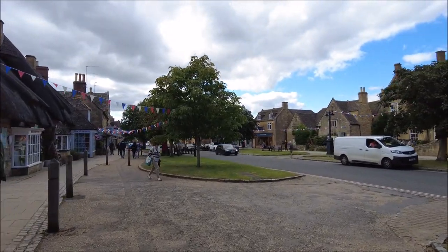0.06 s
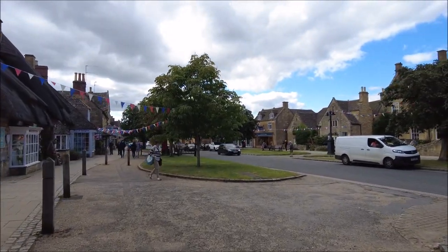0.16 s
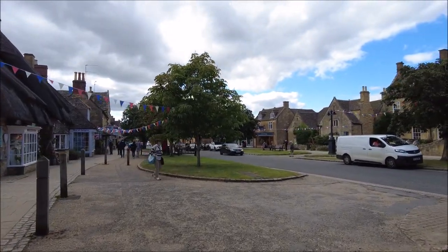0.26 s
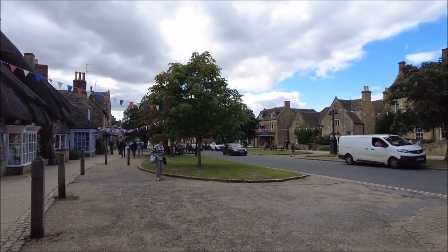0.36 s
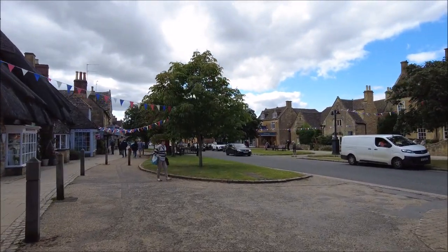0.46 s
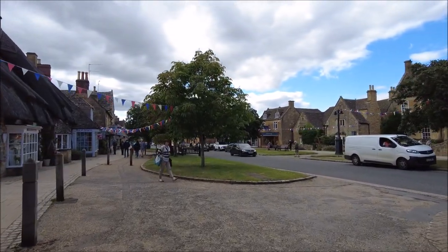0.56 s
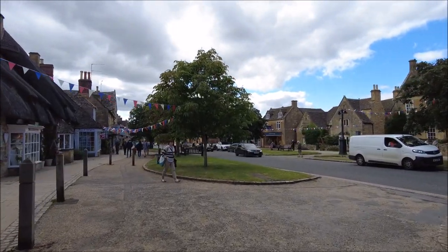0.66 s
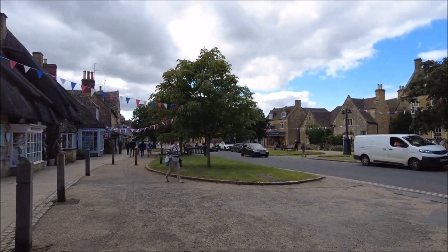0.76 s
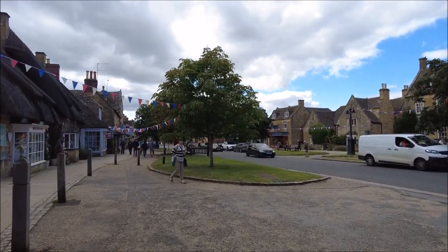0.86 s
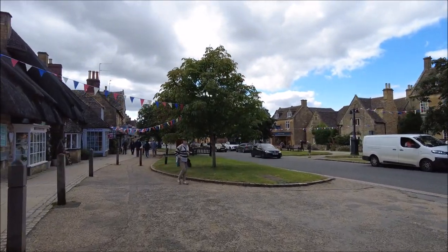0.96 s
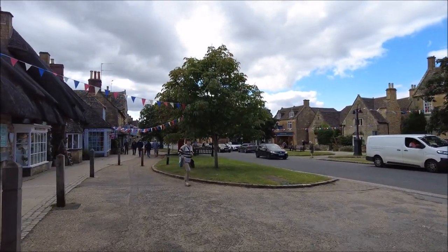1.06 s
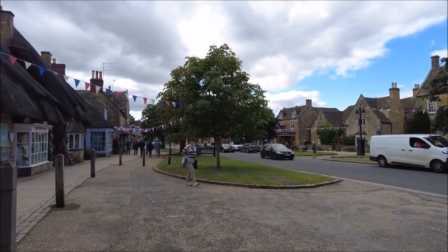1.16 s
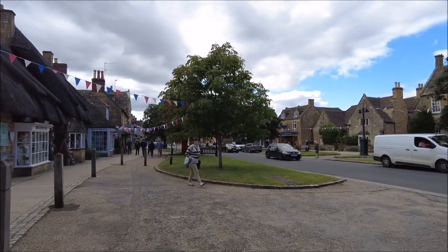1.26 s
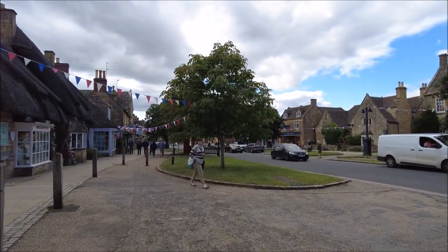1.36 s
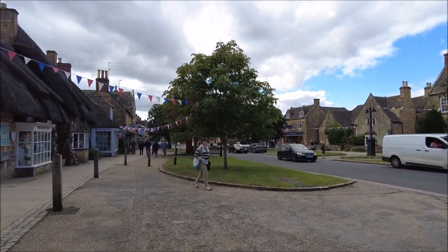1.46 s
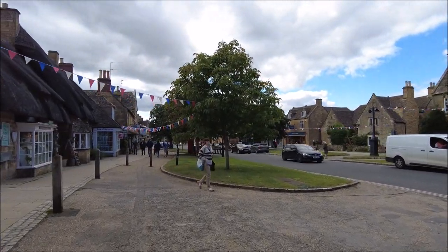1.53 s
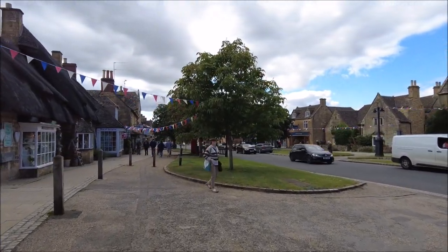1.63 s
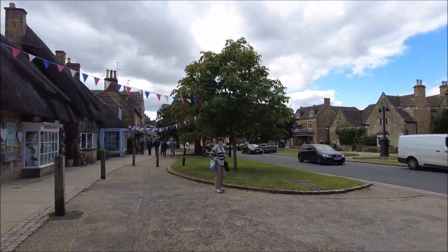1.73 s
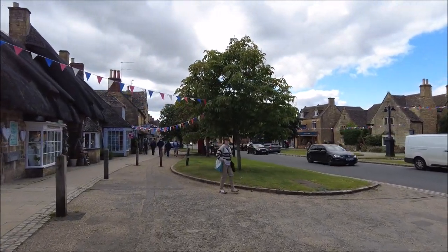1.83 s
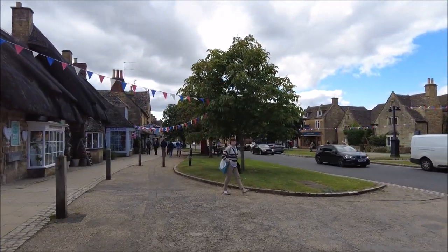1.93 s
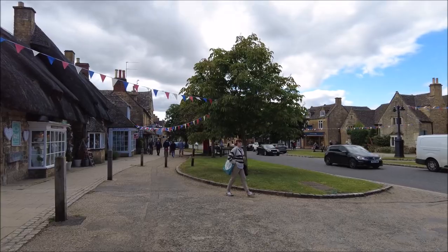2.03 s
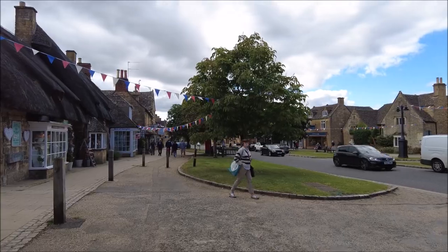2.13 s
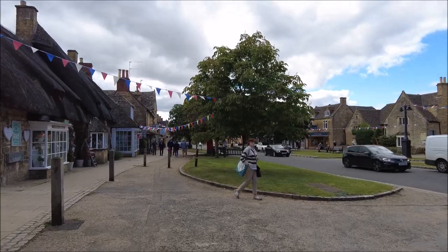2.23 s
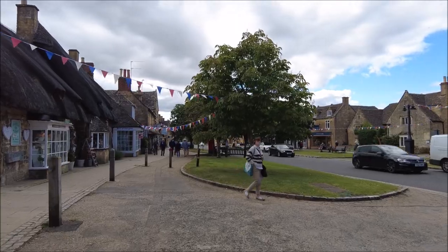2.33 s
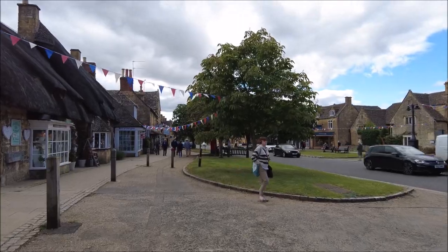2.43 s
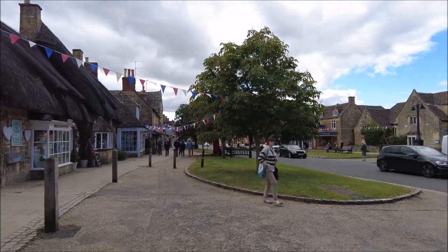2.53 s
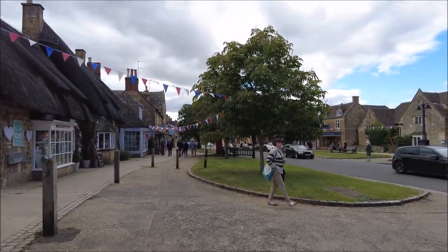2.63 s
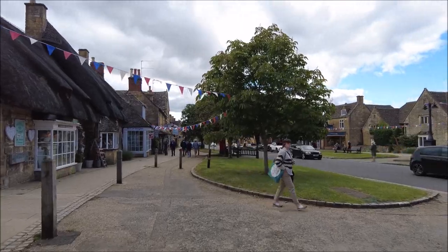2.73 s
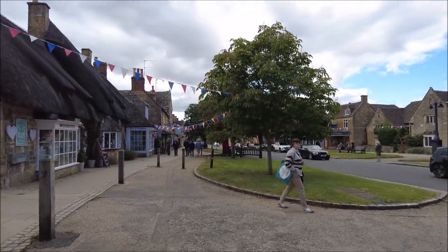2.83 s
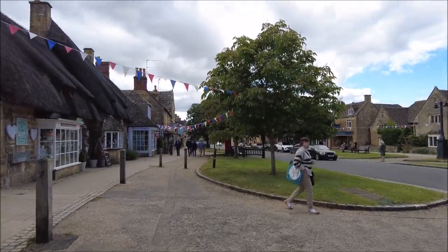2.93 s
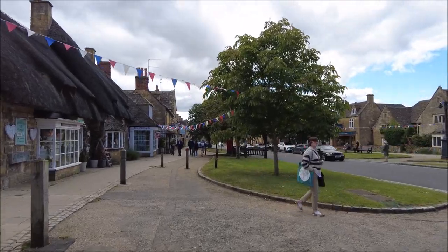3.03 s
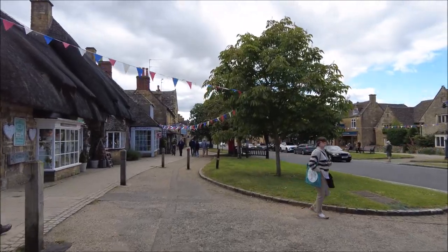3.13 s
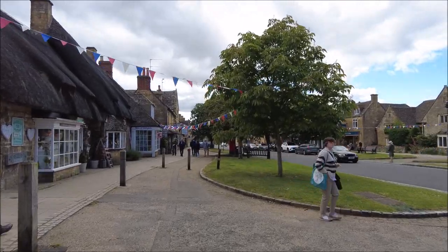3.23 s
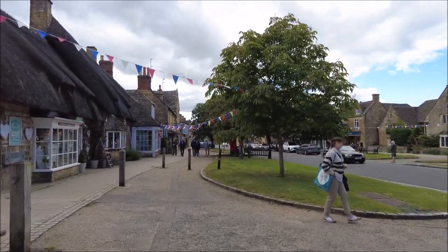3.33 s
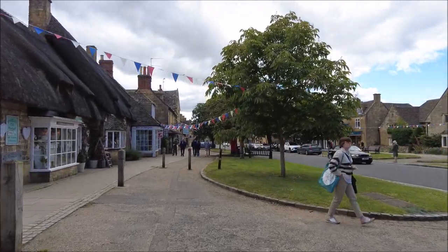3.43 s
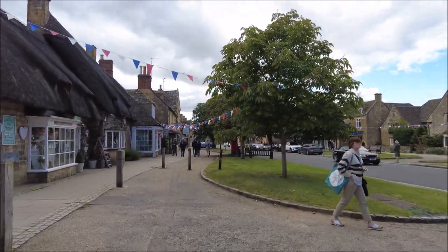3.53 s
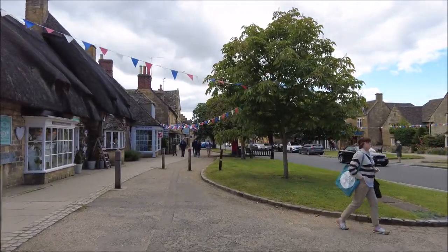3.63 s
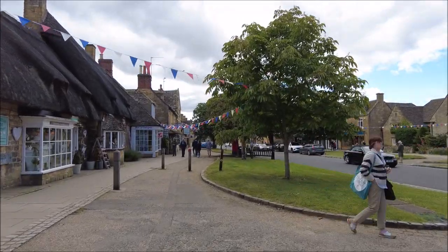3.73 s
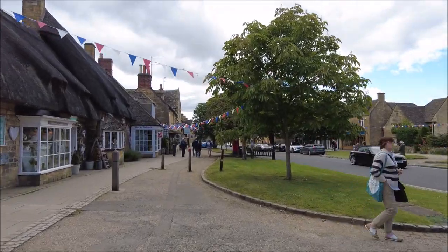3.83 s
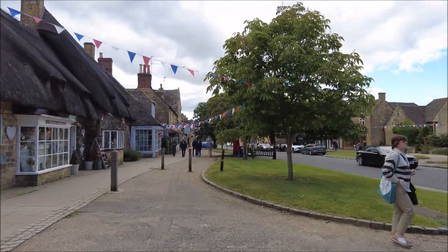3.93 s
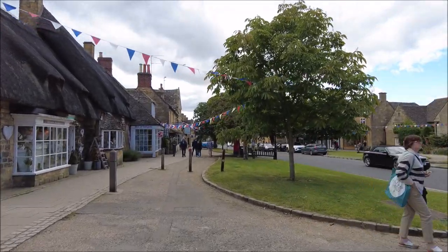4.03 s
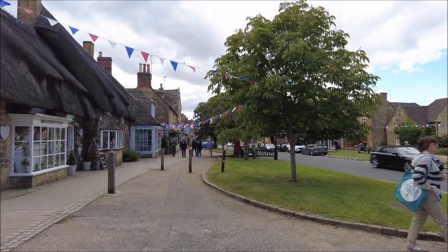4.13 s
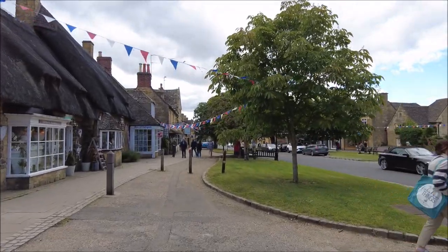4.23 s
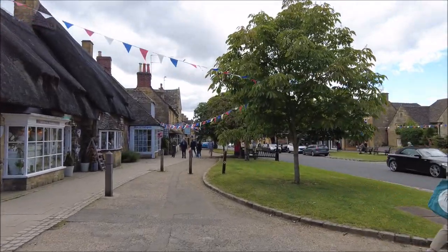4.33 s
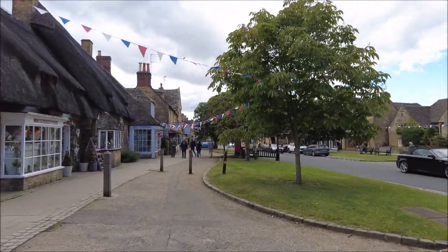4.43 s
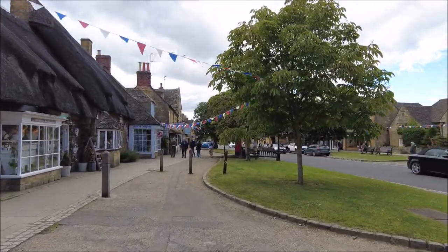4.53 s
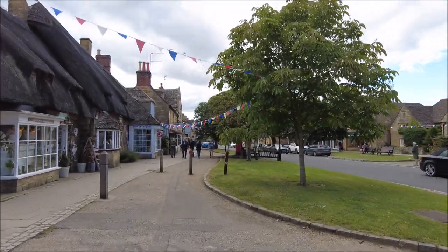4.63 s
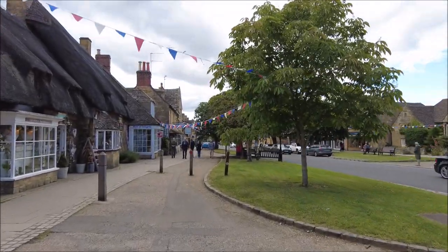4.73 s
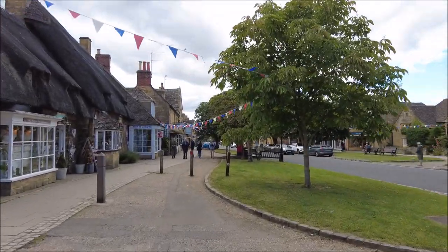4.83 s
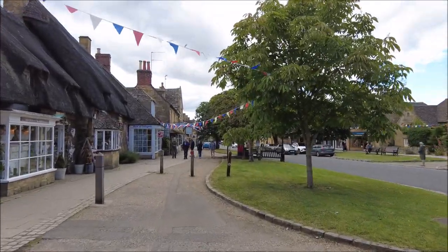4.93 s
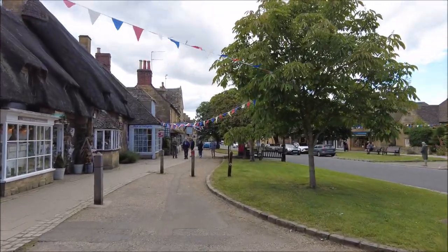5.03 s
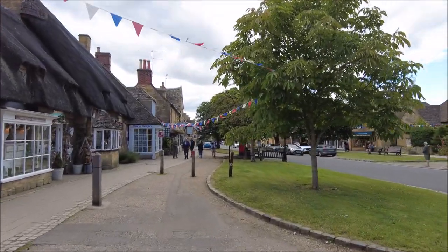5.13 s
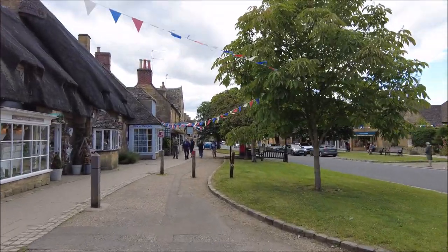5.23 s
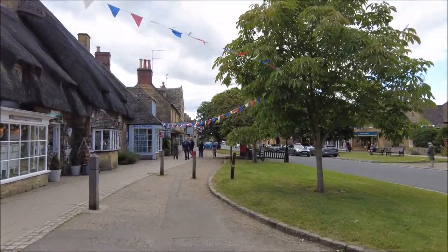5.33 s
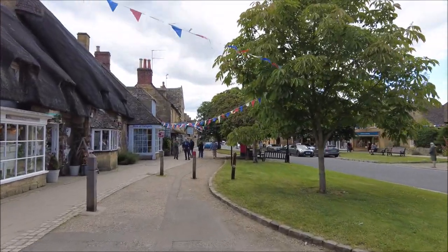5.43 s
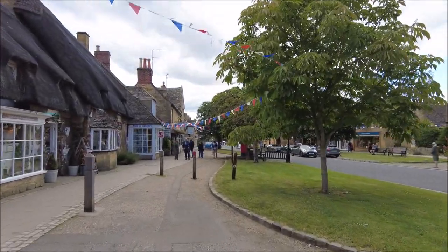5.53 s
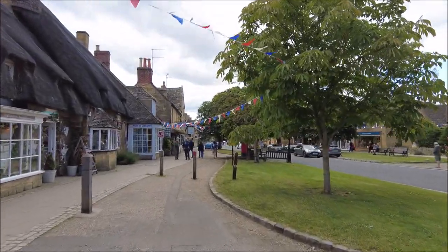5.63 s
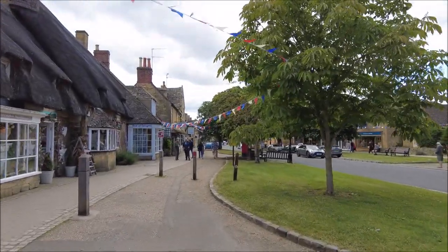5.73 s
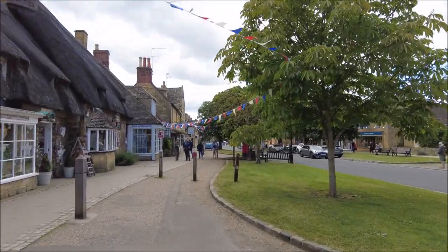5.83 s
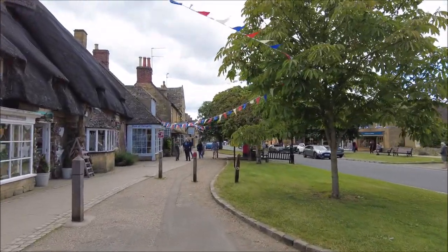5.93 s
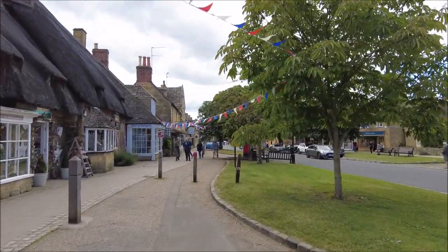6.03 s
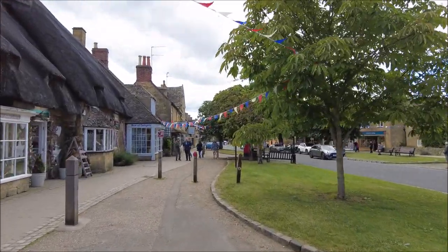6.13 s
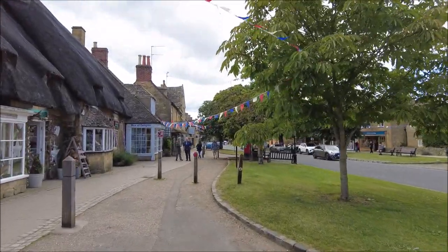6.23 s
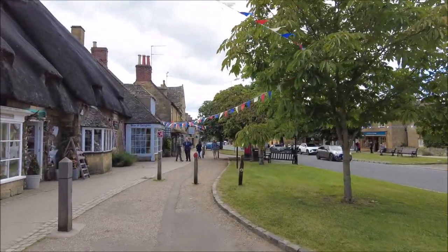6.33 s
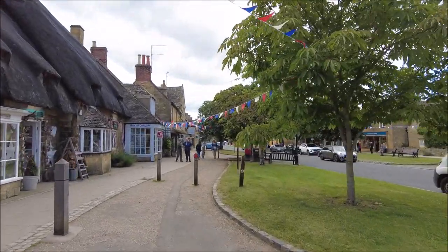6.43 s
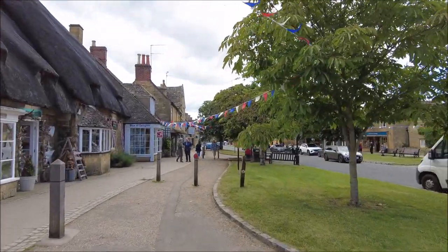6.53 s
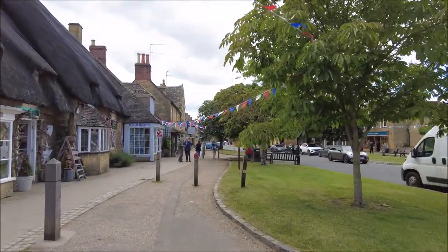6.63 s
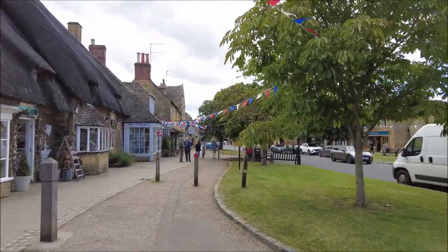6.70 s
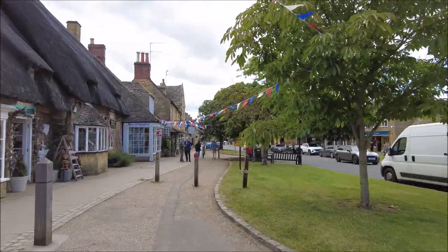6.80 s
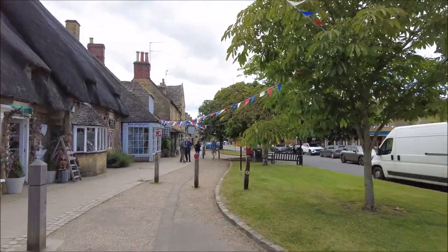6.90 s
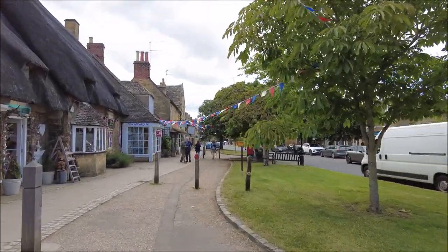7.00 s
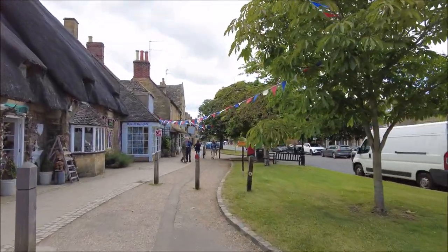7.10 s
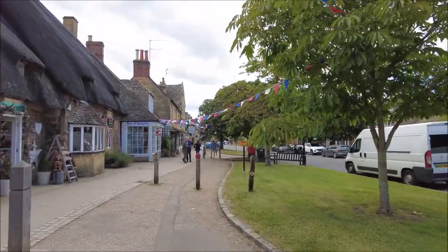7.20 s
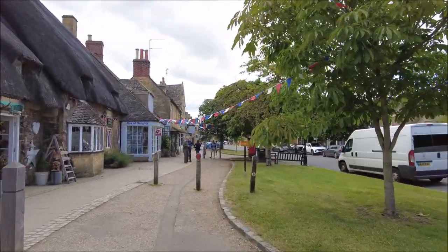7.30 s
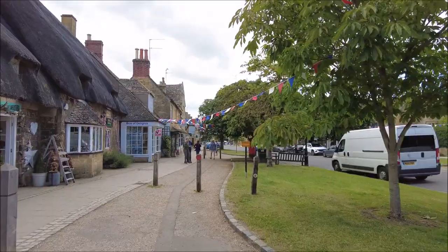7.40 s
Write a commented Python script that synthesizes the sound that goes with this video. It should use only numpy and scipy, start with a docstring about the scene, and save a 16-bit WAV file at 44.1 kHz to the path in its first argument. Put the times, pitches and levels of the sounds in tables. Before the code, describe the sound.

Low traffic rumble and tyre noise outdoors, light wind and shoe scuffs close by, a brief air hiss, and a diesel van speeding up at the end.

```python
"""A village street: five swells of rolling traffic, then a diesel van pulls past on the right and speeds up.
Its exhaust is a series of harmonics of the firing rate, beating against the note of the cars ahead;
road noise is shaped noise that falls with distance. Light wind buffets the microphone of a walker on the
pavement (low noise); shoes scuff (swelling noise) and click (damped rings), a brake squeals faintly (a
gliding tone) and air is released in one short hiss (noise with a whistle and an echo)."""
import sys
import numpy as np
from scipy import signal
from scipy.fft import rfft, irfft
from scipy.io import wavfile
from scipy.ndimage import uniform_filter1d

SR = 44100
rng = np.random.default_rng(int(sys.argv[2]) if len(sys.argv) > 2 else 0)


def wav_record(signal):
    """Record a signal, one row per channel, as 16-bit PCM in the file named by sys.argv[1]."""
    frames = np.transpose(np.atleast_2d(signal))
    bounded = np.clip(frames, -1, 1)
    # unit amplitude maps onto the largest positive 16-bit level
    quanta = np.round(bounded * 32767).astype(np.int16)
    wavfile.write(sys.argv[1], SR, quanta)


N = 328986
T = np.arange(N) / SR  # t/s
HZ = np.fft.rfftfreq(N, 1 / SR)  # f/Hz

# Distant traffic, spectral density: f/Hz, relative density/dB
STREET_COLOUR = [(130, -6.5), (270, -1), (450, -17.5), (650, -23.5), (900, -22), (1150, -24.5), (1450, -20),
                 (1720, -21.5), (2000, -30), (3000, -35), (4500, -38.5), (7000, -45.5), (11000, -54.5),
                 (15000, -58)]
# The same between the two ports: f/Hz, coherence, lead of left/rad, left minus right/dB
STREET_PORTS = [(150, 1, 0.0032, 2), (450, 0.95, 0.013, 2), (700, 0.39, 0.0034, 5), (1020, 0.45, 0.0074, 9),
                (1310, 1, 0.0037, -3), (2000, 0.32, 0.01, 0), (3500, 0.32, 0.013, 0.5),
                (15000, .35, 0.0056, 0.5)]
STREET_DB = -45.06

# Vehicles rolling by: closest at t/s, time to travel its closest distance/s,
# then relative level/dB of body drone, tread roar and tyre hiss
VEHICLES = [(1.37, 0.14, -45.5, -51, -76), (3.101, 1.48, -41, -44, -61.5), (4.7, 0.37, -49, -45, -63),
            (5.45, 1.01, -38, -42, -52.5), (6.9, 1.05, -39.5, -44.5, -59.5)]
# Exponent of distance by which the amplitude of each falls
DRONE_FALL, ROAR_FALL, HISS_FALL = 1.85, 1.99, 1.71
# How far the traffic has come abreast: t/s, share (0 ahead, 1 alongside)
ABREAST_SHARE = [(0, 0), (3.2, 0), (4.2, 0.38), (4.8, 0.89), (5.4, 1), (7.46, 0.97)]
# Drone and roar, spectral density: f/Hz, relative density/dB
ROAR_COLOUR_AHEAD = [(130, 5.5), (180, -2.5), (235, 4), (300, -3), (400, -10.5), (520, -17.5), (700, -13),
                     (900, -11), (1030, -14), (1170, -21.5), (1400, -21), (1750, -24), (2100, -28.5),
                     (2500, -24.5)]
ROAR_COLOUR_ALONGSIDE = [(130, 1.5), (180, -8), (235, -2), (300, -8.5), (400, -14), (520, -16.5),
                         (700, -21.5), (900, -22.5), (1030, -22.5), (1170, -23), (1400, -19), (1750, -24),
                         (2100, -26.5), (2500, -24)]
# Tyre hiss, spectral density: f/Hz, relative density/dB
HISS_COLOUR_AHEAD = [(2500, 0), (3100, -1.5), (3700, -10), (4400, -8), (5500, -18), (7000, -20),
                     (7800, -15), (8600, -21.5), (9500, -19), (11000, -20.5), (12500, -24.5),
                     (15500, -33.5)]
HISS_COLOUR_ALONGSIDE = [(2500, 0.5), (3100, -1), (3700, -3.5), (4400, -5), (5500, -8), (7000, -14),
                         (7800, -12), (8600, -18), (9500, -15.5), (10200, -20), (10900, -17),
                         (11600, -22.5), (12500, -21.5), (15500, -25.5)]
# Top band of the tyre hiss, which opens up once the cars are alongside: t/s, level/dB
FIZZ_LEVEL = [(0, -85), (1.5, -83), (2.6, -72.5), (3.6, -70.5), (4.33, -72.5), (4.58, -66), (5.3, -61),
              (6.1, -60.5), (6.55, -62), (6.9, -65), (7.46, -71.5)]
FIZZ_FROM_HZ = 6100
# Traffic between the two ports: f/Hz, coherence, lead of left/rad, left minus right/dB
AHEAD_PORTS = [(150, 1, -0.45, 3), (500, 0.89, 0.23, 0.5), (756, 0.64, 0.91, 3.5), (1080, 0.55, -0.54, 8),
               (1290, 1, -0.77, -1.5), (1900, 0.6, 1, -3), (4200, .2, -0.45, -11.5), (6000, .2, -.1, -12),
               (10000, .7, 0, -0.5), (15000, .4, -0.1, -11)]
ALONGSIDE_PORTS = [(101, 1, -1.04, 0), (313, 0.77, 0.98, -3), (473, 0.57, -1, 0), (710, 0.82, -2.5, -1.2),
                   (1050, 0.71, -3, 0.6), (1350, 0.5, -0.4, -3), (1950, 0.91, -1, -3),
                   (2800, 0.47, -2, -3.5), (4200, 0.26, -2, -4), (10000, .07, -1.5, -5.5),
                   (15000, .4, 0, -2.5)]

# Firing rate of the cars ahead, nearly steady: t/s, f/Hz
CRUISE_RATE = [(0, 55.5), (2.3, 54), (2.7, 53.3), (5.5, 53.4), (5.9, 54.8), (6.2, 56), (6.5, 54.8),
               (6.85, 54.5), (7.1, 52)]
# Their engine note and its octave come and go: t/s, level/dB
CRUISE_LEVEL = [(0, -44.5), (1.0, -52), (1.5, -55), (2.45, -38), (2.56, -49), (3.03, -31), (3.2, -35),
                (3.3, -40.5), (3.55, -37), (3.95, -31), (4.2, -37), (4.8, -31), (5.7, -29), (6.3, -34),
                (6.8, -38), (7.1, -49.5)]
CRUISE_OCTAVE_LEVEL = [(0, -47), (2.15, -48.5), (2.5, -58), (2.62, -38), (2.85, -42), (3.2, -50),
                       (3.35, -39.5), (4.2, -41.5), (4.5, -45.5), (5.6, -37), (6.2, -41), (6.75, -35.5),
                       (6.95, -47)]
IN_STEP_S = 5.61  # a moment when both engine notes add up

# Firing rate of the diesel van, which idles along and then speeds up: t/s, f/Hz
VAN_RATE = [(0, 57.3), (2.3, 56.4), (4.5, 56.4), (4.9, 55.7), (5.5, 56.7), (5.9, 58.3), (6.1, 59.1),
            (6.42, 59.9), (6.68, 62.7), (7.0, 64.1), (7.3, 66), (7.46, 66.2)]
# Its exhaust fundamental, blipping as the driver steps on the throttle: t/s, level/dB
BOOM_LEVEL = [(0, -56), (1.6, -64), (3.8, -51), (4.5, -39.5), (5.4, -39), (5.76, -37), (5.88, -20.5),
              (6.05, -25.5), (6.33, -26), (6.55, -20.5), (6.72, -15), (7.0, -18.5), (7.3, -12)]
# Its overtones as a group, stronger under load: t/s, relative level/dB
LOAD_LEVEL = [(0, -61.5), (3, -55.5), (4.5, -45.5), (5.6, -49), (6.3, -40.5), (6.7, -37.5), (6.95, -40.5),
              (7.46, -40)]
# Each overtone: multiple of the firing rate, relative level/dB
OVERTONES = [(1.5, -12), (2, 4), (2.5, -19), (3, 0), (3.5, -8), (4, -7), (4.5, -7), (5, -14.5), (6, -7),
             (7, -6)]
# Resonances of the exhaust pipe: f/Hz, relative level/dB
PIPE_RESPONSE = [(75, 15), (108, -3), (128, 0), (160, 0), (180, -7.5), (196, -1), (218, -2.5), (255, -0.5),
                 (360, -6.5), (460, -28)]

# Breeze on the microphone, dropping and then freshening: t/s, relative level/dB
BREEZE_LEVEL = [(0, -42.5), (1.05, -42), (1.5, -45.5), (3.5, -45), (4.3, -38), (7.46, -34.5)]
# Gusts: centre t/s, half length/s, relative level/dB, upper band edge f/Hz
GUST_EVENTS = [(0.794, 0.023, -32.5, 88), (4.06, 0.039, -31.5, 300), (4.562, 0.013, -29.5, 150),
               (5.273, 0.18, -36, 300), (5.772, 0.02, -31.5, 41.7), (5.954, 0.046, -28, 40),
               (6.293, 0.12, -41, 140), (6.68, 0.085, -34, 140.2)]
# Wind, spectral density: f/Hz, relative density/dB
WIND_COLOUR = [(8, -14.5), (22, -1.5), (38, -6.5), (58, 1.5), (85, -5.5), (130, -17), (300, -41)]

# Soft scuffs of soles: start t/s, length/s, peak level/dB
SCUFF_EVENTS = [(0, 0.018, -51), (0.303, 0.13, -61), (.95, 0.082, -64), (1.376, 0.096, -65),
                (1.89, 0.089, -63), (7.301, 0.12, -60)]
# Scuffs, spectral density: f/Hz, relative density/dB
SCUFF_COLOUR = [(800, 7), (2500, 4), (5000, -6), (8000, -13), (12000, -13), (16000, -33)]

# Clicks and knocks of shoes and grit: t/s, relative level/dB, ring f/Hz, ring t60/s, share of crunch
CONTACTS = [(0.4620, -29, 2480, 0.0042, 0.03), (0.4632, -39, 1600, .007, .05),
            (0.8505, -45, 2900, .008, 0.3), (0.953, -38, 1000, .014, .15),
            (1.0134, -21.5, 1230, 0.015, 0.08), (1.0142, -25, 800, .018, .1),
            (1.0165, -41, 1870, 0.075, 0.2), (1.0135, -41, 2100, .025, .3), (1.0192, -20, 350, 0.026, 0.15),
            (1.0328, -22, 1480, 0.011, 0.05), (1.036, -41, 1050, .11, .45), (1.037, -34, 395, .13, .2),
            (1.0655, -48.5, 8900, 0.0019, 0.1), (1.4138, -47, 2600, 0.008, 0.5),
            (1.943, -39, 2300, .004, 0.2), (1.952, -36, 1050, 0.03, 0.2), (1.959, -31, 1250, .02, .15),
            (6.791, -32, 2800, .003, .1)]
# Crunch after a contact: base t60/s, to which twice the ring's t60 is added, and spread/octaves
CRUNCH_T60, CRUNCH_OCTAVES = .032, .6

# Faint brake squeal
SQUEAL_S, SQUEAL_HALF_S, SQUEAL_HZ, SQUEAL_HZ_PER_S, SQUEAL_DB = 3.74, .08, 14600, 2200, -82

# Engine hum of the nearest car, with a Doppler fall
HUM_S, HUM_HALF_S, HUM_HZ, HUM_FALL_HZ_PER_S, HUM_DB = 4.77, .19, 211.7, 3, -39

# Jet of the short hiss: t/s, level/dB
JET_LEVEL = [(6.589, -63), (6.6, -48.5), (6.61, -49.5), (6.619, -47.5), (6.63, -53), (6.638, -52),
             (6.645, -58), (6.66, -57), (6.68, -64), (6.8, -70)]
# Hiss, spectral density: f/Hz, relative density/dB
JET_COLOUR = [(500, -56), (2000, -24), (3300, 4), (4300, -6), (4750, 4), (5400, 1), (6500, 0.5),
              (8000, 2.5), (8700, -1.5), (10500, -1.5), (13000, -11), (16000, -6)]
# Whistle within the hiss, and the duller echo from the street
WHISTLE_S, WHISTLE_HALF_S, WHISTLE_HZ, WHISTLE_WIDTH_HZ, WHISTLE_DB = 6.609, .015, 4850, 160, -49.5
ECHO_S, ECHO_T60, ECHO_TOP_HZ, ECHO_DB = 6.628, .5, 7500, -58.5

# The stereo image closes quickly and opens slowly: start and duration of each
CLOSE_S, CLOSING_S, OPEN_S, OPENING_S = .98, .29, 1.41, 1.95
EDGE_HZ = 15750  # upper band limit


def gain_of(db):
    """Amplitude ratio: 20 dB for each factor of ten."""
    return 10 ** (np.asarray(db) / 20)


def evened(x):
    """Normalisation: the mean of the channels gets rms 1."""
    return x / np.sqrt(np.mean(np.atleast_2d(x).mean(0) ** 2) + 1e-20)


def curve(rows, axis=1):
    """Linear interpolation in time of one column of a table."""
    rows = np.array(rows, float)
    return np.interp(T, rows[:, 0], rows[:, axis])


def read(points, axis=1, hz=HZ):
    """Interpolation of one column of a table along logarithmic frequency."""
    points = np.array(points, float)
    return np.interp(np.log(hz + 1), np.log(abs(points[:, 0]) + 1), points[:, axis])


def white():
    """White noise: a complex Gaussian spectrum of equal expected power in every bin."""
    return rng.standard_normal(len(HZ)) + 1j * rng.standard_normal(len(HZ))


def drift(rate_hz):
    """Random modulation: noise under a Gaussian low-pass, rms 1."""
    return evened(irfft(white() * np.exp(-(HZ / rate_hz) ** 2), N))


def bell(s, half_s):
    """Gaussian envelope of height 1."""
    return np.exp(-.5 * ((T - s) / half_s) ** 2)


def pair(colour, lo_hz, hi_hz, coherence, lead=0, balance_db=0):
    """Partial coherence: a noise band at two ports, whose mean has the given colour and rms 1."""
    same = np.clip(coherence, 0, 1)
    tilt = gain_of(balance_db / 2)
    turn = np.exp(-1j * lead)
    left = white()
    right = same * turn * left + np.sqrt(1 - same ** 2) * white()
    # undo the colour that interference gives the mean of the ports
    middle = np.sqrt(tilt ** 2 + tilt ** -2 + 2 * same * np.real(turn) + 1e-3)
    skirts = np.sqrt((1 + (lo_hz / (HZ + 1)) ** 16) * (1 + (HZ / hi_hz) ** 16))
    spectra = np.array([left * tilt, right / tilt])
    return evened(irfft(spectra * gain_of(read(colour)) / middle / skirts, N))


def ports(table):
    """Interaural cues of one direction: coherence, lead and balance at every bin."""
    return read(table, axis=1), read(table, axis=2), read(table, axis=3)


def firing_turns(rates, wobble=0.003):
    """Phase as the integral of a slightly wandering firing rate, in cycles from the in-step moment."""
    turns = np.cumsum(curve(rates) * (1 + wobble * drift(11.5))) / SR
    return turns - np.interp(IN_STEP_S, T, turns)


def street():
    """Diffuse field: distant traffic merges into a steady wash between the houses."""
    return pair(STREET_COLOUR, 95, 18000, *ports(STREET_PORTS)) * gain_of(STREET_DB)


def passing(ahead, alongside, lo_hz, hi_hz):
    """Equal-power crossfade of colour and direction as the traffic comes abreast."""
    share = np.clip(curve(ABREAST_SHARE), 0, 1)
    far = pair(ahead, lo_hz, hi_hz, *ports(AHEAD_PORTS))
    near = pair(alongside, lo_hz, hi_hz, *ports(ALONGSIDE_PORTS))
    return np.sqrt(1 - share) * far + np.sqrt(share) * near


def rolling(fall, axis):
    """Distance law: each vehicle's power rises as it nears and falls as it leaves; powers add."""
    power = 0
    for row in VEHICLES:
        distance = np.hypot(1, (T - row[0]) / row[1])  # in units of the closest distance
        power = power + gain_of(row[axis]) ** 2 / distance ** (2 * fall)
    return np.sqrt(power)


def road(turns):
    """Rolling noise: drone of bodies, roar of tread and hiss of tyres in adjoining frequency bands."""
    drone = passing(ROAR_COLOUR_AHEAD, ROAR_COLOUR_ALONGSIDE, 137.4, 530)
    drone = drone * rolling(DRONE_FALL, axis=2) * gain_of(0.3 + drift(4.7))
    roar = passing(ROAR_COLOUR_AHEAD, ROAR_COLOUR_ALONGSIDE, 401, 2060)
    roar = roar * rolling(ROAR_FALL, axis=3)
    hiss = passing(HISS_COLOUR_AHEAD, HISS_COLOUR_ALONGSIDE, 2330, FIZZ_FROM_HZ)
    hiss = hiss * rolling(HISS_FALL, axis=4)
    fizz = passing(HISS_COLOUR_AHEAD, HISS_COLOUR_ALONGSIDE, FIZZ_FROM_HZ, 18000)
    fizz = fizz * gain_of(curve(FIZZ_LEVEL))
    # loose grit roughens the hiss
    hiss = (hiss + fizz) * gain_of(0.76 * drift(250))
    # diesel firings throw out puffs of mechanical noise, heard once the van is near
    near = np.interp(T, [5, 6.3], [0, 1])
    clatter = 1 + 0.048 * near * (np.cos(2 * np.pi * turns) + .5 * np.cos(np.pi * turns))
    # uneven asphalt shakes both roar and hiss
    return drone + (roar + hiss) * gain_of(.5 * drift(10)) * clatter


def patchy(x, depth_db, fade_hz, size, count):
    """Shifting interference: bands swell and fade on their own as echoes off the house fronts shift."""
    hz, _, z = signal.stft(x, SR, nperseg=size)
    field = rng.standard_normal(z.shape[1:])
    field = uniform_filter1d(field, size=3, axis=0)
    field = uniform_filter1d(field, size=count, axis=1)
    gain = gain_of(depth_db * field / field.std() / (1 + hz[:, None] / fade_hz))
    gain = gain / np.sqrt(np.mean(gain ** 2, axis=1, keepdims=True))
    return signal.istft(z * gain, SR, nperseg=size)[1][:, :N]


def cruising(turns, balance_db=-0.5):
    """Beats: the cars' engine note lies a little below the van's and throbs against it."""
    low = gain_of(curve(CRUISE_LEVEL) + 0.2 * drift(9)) * np.cos(2 * np.pi * turns)
    octave_gain = gain_of(curve(CRUISE_OCTAVE_LEVEL) + 2.0 * drift(11))
    octave = octave_gain * np.cos(4 * np.pi * turns + 0.93 * drift(8.3))
    return np.sqrt(2) * (low + octave) * gain_of([[balance_db / 2], [-balance_db / 2]])


def exhaust(turns, balance_db=-2.0, lag_s=0.0002):
    """Source and filter: harmonics of the firing rate glide through the resonances of the pipe."""
    # from afar the sound arrives by shifting paths: it wavers more
    near = np.interp(T, [5.2, 6.1], [0, 1])
    level = curve(BOOM_LEVEL) + 2.0 * (1 - near) * drift(5.2)
    boom = gain_of(level) * np.cos(2 * np.pi * turns) * (1 + 0.043 * drift(37))
    # no two firings are alike, so level and phase of the overtones break up
    rate = curve(VAN_RATE)
    overtones = 0
    for k, db in OVERTONES:
        gain = gain_of(db + read(PIPE_RESPONSE, hz=k * rate) + 3.0 * drift(8.1))
        phase = 2 * np.pi * k * turns + 0.41 * drift(3.5) + 0.13 * drift(35)
        overtones = overtones + gain * np.cos(phase)
    note = np.sqrt(2) * (boom - gain_of(curve(LOAD_LEVEL)) * overtones)
    # the van is on the right: the left port hears it later and, once near, weaker
    lean_db = near * balance_db / 2 - (1 - near) * drift(15.0)
    return np.array([np.interp(T - lag_s, T, note), note]) * gain_of([lean_db, -lean_db])


def wind():
    """Turbulent pressure: lumpy low noise of a breeze, and gusts that strike the ports unequally."""
    breeze = gain_of(curve(BREEZE_LEVEL)) * pair(WIND_COLOUR, 8, 270, 0.99)
    gusts = 0
    for s, half_s, db, top_hz in GUST_EVENTS:
        gust = pair(WIND_COLOUR, 8, top_hz, 0.99, balance_db=-3)
        gusts = gusts + gain_of(db) * bell(s, half_s) * gust
    return (breeze + gusts) * gain_of(2 + 2 * drift(26))


def scuffs():
    """Sliding friction: soles on grit give short grainy swells of noise."""
    press = 0
    for s, length_s, db in SCUFF_EVENTS:
        press = press + gain_of(db) * np.sin(np.pi * np.clip((T - s) / length_s, 0, 1))
    return pair(SCUFF_COLOUR, 700, 18000, 0.58) * press * gain_of(3 * drift(495))


def knocks(rise_cycles=0.62):
    """Damped resonance: each contact builds up, rings and leaves a short crunch around its pitch."""
    out = np.zeros((2, N))
    size = 8192
    t = np.arange(size) / SR
    octave = np.log2(np.fft.rfftfreq(size, 1 / SR) + 1)
    for s, db, hz, t60, share in CONTACTS:
        ring = np.sin(2 * np.pi * hz * t) * np.exp(-np.log(1000) * t / t60)
        band = np.exp(-.5 * ((octave - np.log2(hz)) / CRUNCH_OCTAVES) ** 2)
        middle, side = irfft(rfft(rng.standard_normal((2, size))) * band)
        crunch = evened(np.array([middle + .5 * side, middle - .5 * side]))
        crunch = crunch * np.exp(-np.log(1000) * t / (CRUNCH_T60 + 2 * t60))
        attack = 1 - np.exp(-(t * hz / rise_cycles) ** 2)
        contact = gain_of(db) * attack * (ring + share * crunch)
        part = out[:, round(s * SR):][:, :size]
        part += contact[:, :part.shape[1]]
    return out


def squeal():
    """Frequency modulation: the thin, unsteady whistle of a brake glides upward."""
    hz = SQUEAL_HZ + SQUEAL_HZ_PER_S * (T - SQUEAL_S) + 130 * drift(150)
    tone = np.sin(2 * np.pi * np.cumsum(hz) / SR)
    return gain_of(SQUEAL_DB) * bell(SQUEAL_S, SQUEAL_HALF_S) * tone


def hum():
    """Doppler effect: one engine order of the nearest car sinks in pitch as it passes."""
    hz = HUM_HZ - HUM_FALL_HZ_PER_S * (T - HUM_S) + 1.2 * drift(12.5)
    tone = np.sqrt(2) * np.sin(2 * np.pi * np.cumsum(hz) / SR)
    return gain_of(HUM_DB) * bell(HUM_S, HUM_HALF_S) * tone


def spurt(balance_db=-4):
    """Jet noise: released air sputters on the road side, whistles early on and leaves a dull echo."""
    sounding = (T > JET_LEVEL[0][0]) & (T < JET_LEVEL[-1][0])
    jet = pair(JET_COLOUR, 1000, 18000, 0.32, 0, balance_db)
    jet = jet * gain_of(curve(JET_LEVEL)) * sounding
    lo_hz, hi_hz = WHISTLE_HZ - WHISTLE_WIDTH_HZ / 2, WHISTLE_HZ + WHISTLE_WIDTH_HZ / 2
    whistle = pair(JET_COLOUR, lo_hz, hi_hz, 0.47, 0, balance_db) * gain_of(WHISTLE_DB)
    whistle = whistle * np.clip(1 - ((T - WHISTLE_S) / WHISTLE_HALF_S) ** 4, 0, 1)
    age = np.maximum(T - ECHO_S, 0)
    echo = pair(JET_COLOUR, 1000, ECHO_TOP_HZ, .3) * gain_of(ECHO_DB)
    echo = echo * (age > 0) * np.exp(-np.log(1000) * age / ECHO_T60)
    return (jet + whistle + echo) * gain_of(drift(300))


def scene():
    """Superposition of traffic, wind and the small sounds of the pavement."""
    turns = firing_turns(VAN_RATE)
    traffic = street() + road(turns)
    traffic = patchy(traffic, depth_db=2.03, fade_hz=4000, size=1024, count=14)
    traffic = patchy(traffic, depth_db=1.7, fade_hz=1510, size=4096, count=6)
    engines = cruising(firing_turns(CRUISE_RATE)) + exhaust(turns) + hum()
    return traffic + engines + wind() + scuffs() + knocks() + squeal() + spurt()


def width():
    """Stereo width as the gain of the side signal, 0 to 1."""
    closing = np.clip((T - CLOSE_S) / CLOSING_S, 0, 1)
    opening = np.clip((T - OPEN_S) / OPENING_S, 0, 1)
    return 1 - closing + opening ** 2


def record(dry):
    """Middle and side decomposition sets the width, then a linear-phase low-pass limits the band."""
    middle = dry.mean(0)
    image = middle + (dry - middle) * width()
    low_pass = signal.firwin(511, EDGE_HZ, window=("kaiser", 9), fs=SR)
    return signal.oaconvolve(image, low_pass[None], "same")


dry = scene()
out = record(dry)
wav_record(out)
```